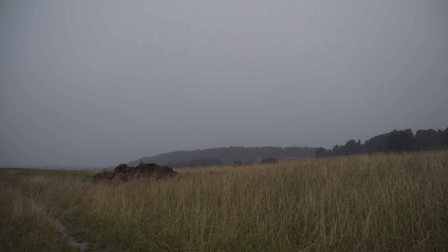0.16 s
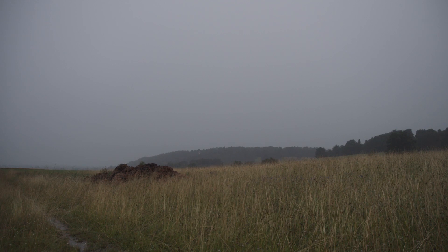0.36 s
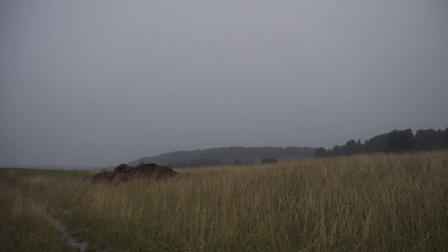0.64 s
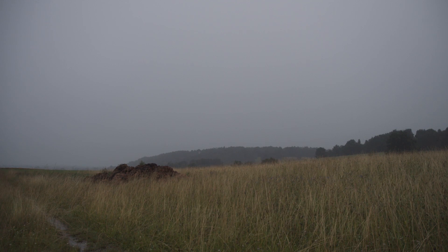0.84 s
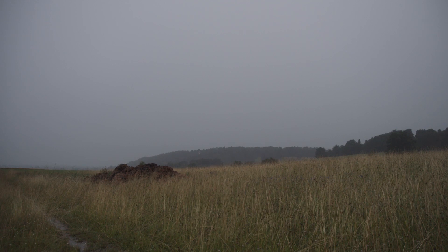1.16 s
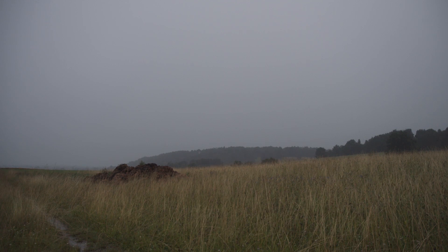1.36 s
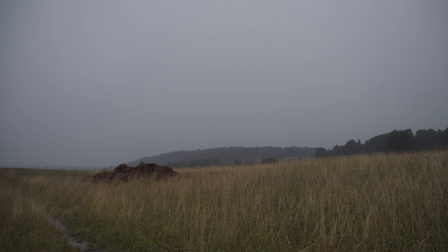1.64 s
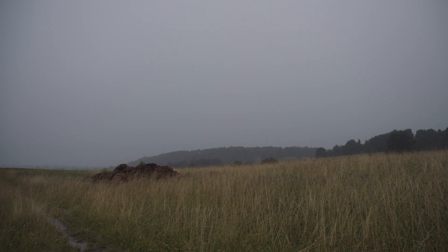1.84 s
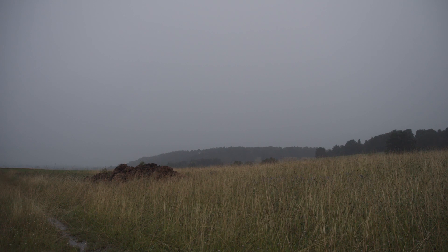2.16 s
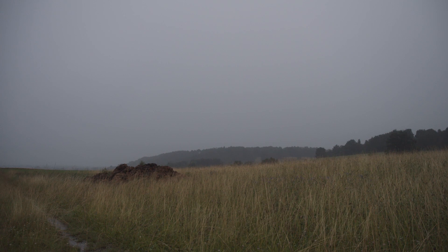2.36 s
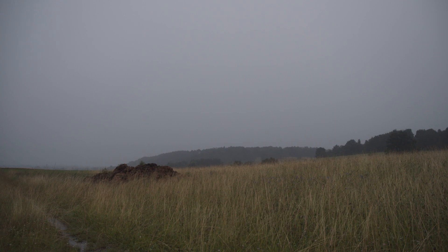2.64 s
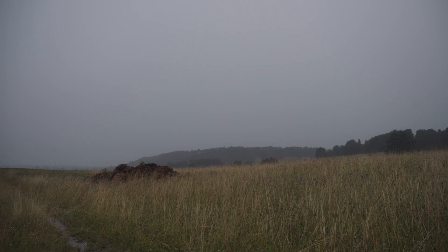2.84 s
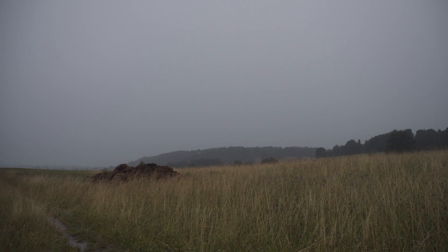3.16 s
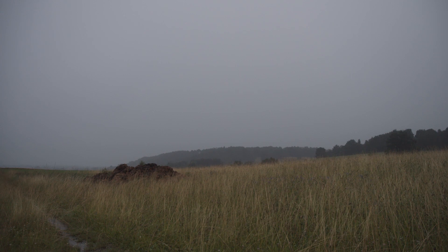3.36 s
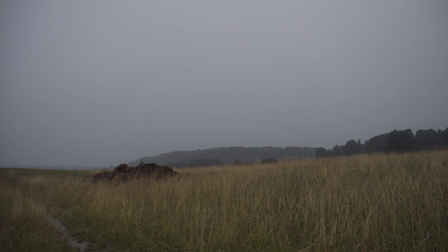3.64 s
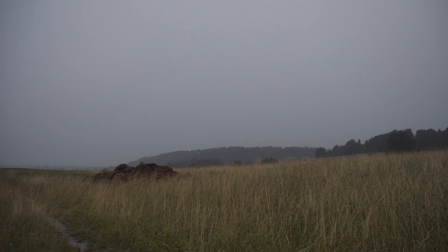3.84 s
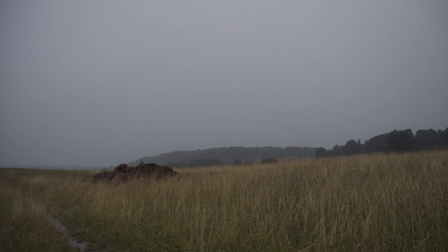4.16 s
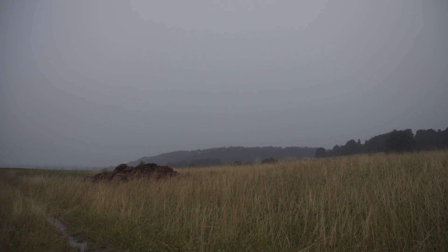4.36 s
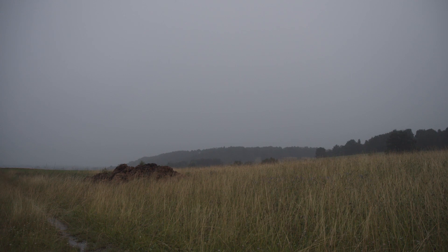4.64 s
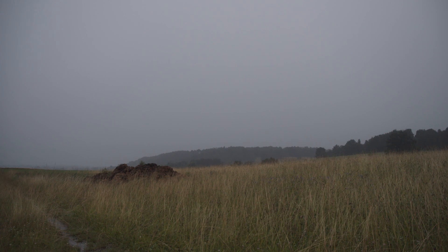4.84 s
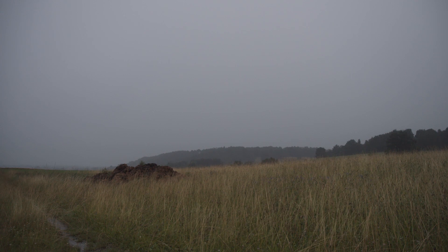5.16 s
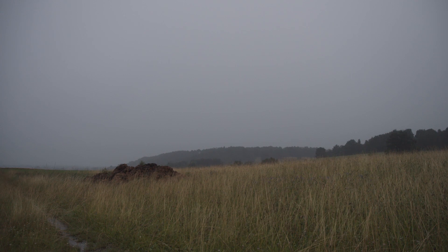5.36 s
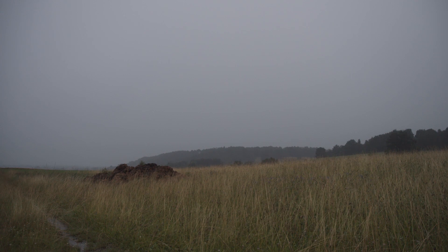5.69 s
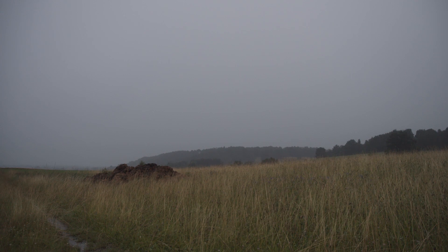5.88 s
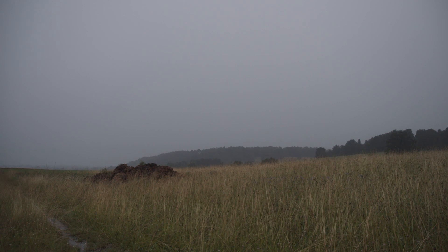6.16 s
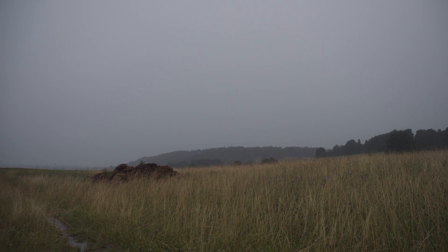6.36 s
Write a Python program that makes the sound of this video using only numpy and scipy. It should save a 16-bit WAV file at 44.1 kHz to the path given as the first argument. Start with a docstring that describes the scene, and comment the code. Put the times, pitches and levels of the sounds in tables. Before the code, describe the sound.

Close thunder tears and cracks sharply over an open grassy field, then sinks into a deep booming roll above light rain.

```python
"""Thunder tears brightly, with claps almost from the start, over light rain; it cracks hardest near one second,
then sinks into a deeper, booming roll.
The crooked lightning channel sends shock fronts, summed here as trains of short pulses in surges and claps.
An open field reflects each front a moment later and a forest edge scatters a soft tail. Rain is filtered
noise with a patter of grains, breeze is low noise, and drops tick and thud close to the microphone."""
import sys
import numpy as np
from scipy import signal
from scipy.fft import rfft, irfft
from scipy.io import wavfile
from scipy.ndimage import uniform_filter1d

SR = 44100
rng = np.random.default_rng(int(sys.argv[2]) if len(sys.argv) > 2 else 0)


def file_out(sig):
    """Save sig as 16-bit WAV at sys.argv[1]."""
    # one column per channel
    cols = np.atleast_2d(sig).T
    # limit, then scale
    lim = np.clip(cols, -1, 1)
    pcm = np.round(lim * 32767).astype(np.int16)
    wavfile.write(sys.argv[1], SR, pcm)


N = 287532  # samples


def gain_of(db):
    """Logarithmic level: decibels become an amplitude factor."""
    return 10 ** (np.asarray(db) / 20)


def evened(x):
    """Energy normalisation: scales to rms 1 over all channels together."""
    return x / np.sqrt(np.mean(x ** 2) + 1e-20)


def read(points, hz):
    """Logarithmic frequency scale: interpolates a table along it."""
    f, value = np.transpose(points)
    return np.interp(np.log(hz + 1), np.log(f + 1), value)


def add(mix, s, sound):
    """Superposition: sums a stereo sound into the mix at time s."""
    start = max(round(s * SR), 0)
    part = mix[:, start:][:, :sound.shape[-1]]
    part += sound[..., :part.shape[-1]]


def shaped(x, gain):
    """Linear filtering: multiplies the spectrum of x by gain(hz)."""
    hz = np.fft.rfftfreq(x.shape[-1], 1 / SR)
    return irfft(rfft(x) * gain(hz), x.shape[-1])


def pulse(db, size=4096):
    """Minimum phase: the sharpest causal pulse with spectrum db(hz), scaled to energy 1."""
    hz = abs(np.fft.fftfreq(size, 1 / SR))
    log_gain = np.log(np.maximum(gain_of(db(hz)), 1e-5))
    # the Hilbert transform of the log gain supplies the phase
    wave = np.fft.ifft(np.exp(np.conj(signal.hilbert(log_gain)))).real
    return wave / np.linalg.norm(wave)


# Spectrum of one shock front, before air loss: pitch_hz [Hz], level_db [dB, relative]
FRONT_SPECTRUM = [(15, -60), (25, -3), (175, 0), (215, -1.5), (258, 1), (403, -1), (477, -0.5), (553, -3.5),
                  (641, -2.5), (862, -6.5), (1140, -14.5), (1230, -14.5), (2100, -35.5), (2730, -65),
                  (4620, -120)]


def shock(absorb_db, air_hz=2000):
    """Atmospheric absorption: above air_hz the loss in dB grows with the square of frequency."""
    def spectrum_db(hz):
        air_loss_db = absorb_db * np.maximum((hz / air_hz) ** 2 - 1, 0)
        return read(FRONT_SPECTRUM, np.minimum(hz, air_hz)) - air_loss_db
    return pulse(spectrum_db)


BASS_HZ, EDGE_HZ = 160, 850  # borders between bass, body and tearing edge


def registers(x, order=8):
    """Complementary filtering: bass, body and tearing edge that sum to the whole thunder."""
    bass = shaped(x, lambda hz: 1 / (1 + (hz / BASS_HZ) ** order))
    below_edge = shaped(x, lambda hz: 1 / (1 + (hz / EDGE_HZ) ** order))
    return bass, below_edge - bass, x - below_edge


def from_sky(fronts, width=0.091):
    """Interaural level difference: each front has its own direction and favours one side a little."""
    side = width * rng.standard_normal(len(fronts))
    return np.array([fronts * (1 + side), fronts * (1 - side)])


def boil(x, patch_db=2.5, size=1024, frame_count=13, bin_count=2):
    """Interference along paths through moving air: narrow bands swell and fade at random."""
    overlap = size * 3 // 4
    z = signal.stft(x, nperseg=size, noverlap=overlap)[2]
    noise = rng.standard_normal(z.shape[1:])  # one pattern for both sides
    smooth_in_time = uniform_filter1d(noise, frame_count, 1)
    patches = evened(uniform_filter1d(smooth_in_time, bin_count, 0))
    z = z * gain_of(patch_db * np.clip(patches, -2, 2))
    return signal.istft(z, nperseg=size, noverlap=overlap)[1][:, :N]


SURGE_RISE = 0.69  # a surge builds in this share of the time it takes to fade

# Branches of the channel, each heard as one surge of the roll:
# crest_s [s], level_db [dB, of the body], fade_s [s, to 1/e in power], brightness_db [dB]
BRANCH_SURGES = [(0.116, -42.5, 0.018, 5.5), (0.301, -38, 0.073, 3), (0.398, -40.5, 0.031, 12),
                 (0.534, -42, 0.043, 3), (0.727, -37.5, 0.047, -2.5), (1.067, -39.5, 0.041, 2),
                 (1.177, -46, 0.068, 3.5), (1.304, -49.5, 0.036, 9), (1.385, -46, 0.028, -9),
                 (1.48, -60.5, 0.035, 17), (1.599, -48.5, 0.051, 4), (1.852, -38, 0.059, -0.5),
                 (1.98, -47.5, 0.05, 10), (2.217, -42.5, 0.026, 4), (2.469, -42.5, 0.072, 0.5),
                 (2.59, -46, 0.059, -10.5), (2.678, -39, 0.049, -1), (2.81, -43, 0.018, -8),
                 (2.979, -38, 0.072, -4.5), (3.11, -38, 0.059, -4), (3.228, -39, 0.014, -5),
                 (3.288, -45, 0.055, -5.5), (3.379, -37.5, 0.024, -4), (3.503, -40, 0.038, 0),
                 (3.6, -40, 0.055, -2), (3.709, -39.5, 0.068, 5), (3.843, -35, 0.032, -2),
                 (3.92, -43, 0.066, -4.5), (4.107, -38, 0.079, 1), (4.2, -43, 0.069, 4),
                 (4.322, -40.5, 0.085, 0), (4.415, -44.5, 0.037, 8.5), (4.516, -43.5, 0.039, -9.5),
                 (4.655, -46, 0.034, 4), (4.76, -42.5, 0.083, 0.5), (4.862, -48.5, 0.021, 7),
                 (5.014, -49.5, 0.069, -4.5), (5.367, -53, 0.16, 2), (5.744, -53.5, 0.1, -6.5),
                 (5.912, -47.5, 0.1, 1), (6.285, -43, 0.071, -2.5), (6.47, -44.5, 0.1, -2.5)]


def surges(t, leaning):
    """Incoherent power sum of surges; brightness enters with the factor leaning."""
    power = 0
    for crest, db, fade, bright in BRANCH_SURGES:
        distance = np.maximum((t - crest) / fade, (crest - t) / (fade * SURGE_RISE))
        power = power + gain_of(db + leaning * bright) ** 2 * np.exp(-distance ** 2)
    return np.sqrt(power)


# The near, low part of the channel tears brightly; the far part up in the cloud booms.
# Levels are against the body.
EDGE_NEAR_DB, EDGE_FAR_DB, EDGE_FADE_S = -3.5, -13.5, 1.92
BASS_NEAR_DB, BASS_FAR_DB = -8.5, -5.5
BOOM_S, BOOM_ONSET_S = 2.4, 0.11  # when the boom takes over, and how gradually

# Unbroken rumble under the surges: time_s [s], level_db [dB, before bed_trim_db]
RUMBLE_BED = [(0.0, -42.5), (1.12, -41), (1.32, -46), (1.61, -47.5), (1.85, -55.5), (1.98, -42.5),
              (2.4, -45.5), (2.61, -43.5), (4.34, -41.5), (5.08, -46), (6.19, -47.5), (6.52, -56)]


def roll(fronts_per_s=1800, clump_db=1.11, clump_hz=35, bed_trim_db=-4.0,
         bed_bass_db=3.0, bed_edge_db=2.5, step_count=64):
    """Superposed fronts from countless channel kinks: strength throbs, and later sound is deeper."""
    t = np.arange(0, N, step_count) / SR
    bed = gain_of(np.interp(t, *np.transpose(RUMBLE_BED)) + bed_trim_db)
    boom = (1 + np.tanh((t - BOOM_S) / BOOM_ONSET_S)) / 2
    bass_db = BASS_NEAR_DB + (BASS_FAR_DB - BASS_NEAR_DB) * boom
    edge_db = EDGE_FAR_DB + (EDGE_NEAR_DB - EDGE_FAR_DB) * np.exp(-t / EDGE_FADE_S)
    # a bright surge has less bass and more edge
    bass_level = gain_of(bass_db) * np.hypot(surges(t, -1.3), gain_of(bed_bass_db) * bed)
    body_level = np.hypot(surges(t, 0), bed)
    edge_level = gain_of(edge_db) * np.hypot(surges(t, 0.74), gain_of(bed_edge_db) * bed)
    levels = [bass_level, body_level, edge_level]

    # a fast, uneven throb
    clumps = evened(shaped(rng.standard_normal(N), lambda hz: hz / clump_hz * np.exp(-hz / clump_hz)))
    sizes = gain_of(clump_db * clumps) * rng.choice([-1, 1], N)
    fronts = from_sky(sizes * (rng.random(N) < fronts_per_s / SR))
    thunder = signal.oaconvolve(fronts, shock(absorb_db=40.5)[None])[:, :N]
    bands = registers(boil(thunder))
    now = np.arange(N) / SR
    return sum(np.interp(now, t, level) * evened(band) for level, band in zip(levels, bands))


# Spectrum of the rain: pitch_hz [Hz], level_db [dB per Hz, relative]
RAIN_SPECTRUM = [(20, 16.5), (100, -5), (500, 4), (1500, 10.5), (2800, 4), (4000, -0.5), (5500, -1),
                 (6700, -3.5), (10000, -5.5), (13000, -10), (15000, -6), (16000, -33.5)]
# Likeness of the rain at left and right: pitch_hz [Hz], shared_power [share, 0 to 1]
RAIN_LIKENESS = [(20, 0.09), (1500, 0.57), (4000, 0.67), (8000, 0.13), (16000, 0)]


def rain(level_db=-66.0, patter=0.42, patter_per_s=900, size_db=14.0):
    """Partially coherent noise: far drops merge into a hiss, nearer ones patter in the grass."""
    sizes = gain_of(size_db * np.minimum(rng.exponential(1, (3, N)), 5))
    grains = sizes * (rng.random((3, N)) < patter_per_s / SR)
    signed_grains = grains * rng.choice([-1, 1], (3, N))
    drive = rng.standard_normal((3, N)) + patter * evened(signed_grains)

    def same(hz):
        return np.clip(read(RAIN_LIKENESS, hz), 0, 1)
    own = shaped(drive[:2], lambda hz: np.sqrt(1 - same(hz)))
    shared = shaped(drive[2], lambda hz: np.sqrt(same(hz)))
    coloured = shaped(own + shared, lambda hz: gain_of(read(RAIN_SPECTRUM, hz)))
    return gain_of(level_db) * evened(coloured)


def breeze(level_db=-64.0, top_hz=55., low_hz=22.):
    """Incoherent low-frequency noise: moving air rumbles faintly, differently on each side."""
    def spectrum(hz):
        return hz ** 2 / (hz ** 2 + low_hz ** 2) / (1 + (hz / top_hz) ** 2)
    return gain_of(level_db) * evened(shaped(rng.standard_normal((2, N)), spectrum))


# Lag of the ground bounce, longer the higher the sounding part of the channel stands:
# time_s [s], lag_s [s]
GROUND_LAG = [(0, 0.0063), (.6, 0.0046), (1.2, 0.0049), (2.2, 0.004), (2.7, 0.0048), (3.2, 0.0066),
              (4.1, 0.0063), (4.6, 0.0056), (6.5, 0.0056)]


def ground(x, bounce=0.33, grass_hz=890.0):
    """Comb filtering: the field returns each front late and dulled, a hollow colour that drifts."""
    now = np.arange(N)
    then = now - SR * np.interp(now / SR, *np.transpose(GROUND_LAG))
    dull = shaped(x, lambda hz: 1 / (1 + (hz / grass_hz) ** 2))
    bounced = np.array([np.interp(then, now, side) for side in dull])
    return (x + bounce * bounced) / np.sqrt(1 + bounce ** 2)


# Decay time of the forest tail: pitch_hz [Hz], t60_s [s, to fall 60 dB]
FOREST_DECAY = [(40, 1), (300, 0.2), (1000, 0.97), (3000, 0.8)]


def forest(x, rise_s=0.081):
    """Diffuse scattering: trees return a soft one-second tail that dies fastest around 300 Hz."""
    hz, t, z = signal.stft(rng.standard_normal((2, SR)), SR, nperseg=256)
    decay = gain_of(-60 * t / read(FOREST_DECAY, hz)[:, None])
    z *= decay * (1 - np.exp(-t / rise_s))
    tail = signal.istft(z, SR, nperseg=256)[1]
    return signal.fftconvolve(x, tail / np.linalg.norm(tail[0]), axes=1)[:, :N]


CLAP_BASS_DB, CLAP_EDGE_DB = -15, -18  # against the body, at brightness 0

# Stretches of channel that lie broadside and arrive all at once:
# start_s [s, main front], level_db [dB, strongest moment, before trim_db],
# brightness_db [dB, edge up and bass down], pitch_hz [Hz, of the knock], spread_s [s, fade to 1/e]
BROADSIDE_CLAPS = [(0.099, -31, 9, 837, 0.0054), (0.247, -23, 7, 420, 0.026), (0.295, -20, 9.5, 372, 0.007),
                   (0.693, -28.5, 10, 448, 0.0042), (0.802, -25.5, 2, 266, 0.008),
                   (0.875, -28, 7.5, 213, 0.012), (0.938, -28.5, 0, 180, 0.007),
                   (0.967, -14.5, 5, 257, 0.017), (0.981, -18.5, 7, 220, 0.016),
                   (0.993, -15, -17, 493, 0.0058), (1.019, -20.5, -1.5, 277, 0.0059),
                   (1.054, -17.5, -5, 301, 0.006), (1.142, -22, -6, 780, 0.0053),
                   (1.18, -26, 6, 180, 0.0091), (1.201, -28, 0, 450, 0.013), (1.243, -21, 6, 770, 0.0089),
                   (1.39, -26.5, 5, 300, 0.0081), (1.555, -29, -15, 190, 0.0062),
                   (1.853, -24, -11, 500, 0.0079), (1.894, -26.5, -8, 537, 0.039),
                   (1.958, -25.5, 4, 490, 0.004), (2.011, -25.5, -9, 194, 0.011),
                   (2.041, -22, -3, 267, 0.0096), (2.212, -25, -9, 288, 0.022),
                   (2.304, -34, 12, 326, 0.006), (2.498, -28, 4, 530, 0.014), (2.615, -24, 4, 286, 0.016),
                   (2.657, -22, 13, 664, 0.005), (2.676, -20, 3, 316, 0.0062), (2.741, -24, -3, 618, 0.013),
                   (2.76, -26, -6, 297, 0.0058), (3.573, -27.5, 2, 386, 0.0061),
                   (3.615, -29.5, 3, 258, 0.0044), (3.743, -24.5, 0, 348, 0.015),
                   (3.762, -25.5, -5, 335, 0.018), (3.862, -24.5, -1, 178, 0.006),
                   (4.159, -30, 0, 630, 0.0078), (4.401, -27.5, 6, 364, 0.014),
                   (4.752, -24.5, -5, 366, 0.0076), (4.868, -30.5, 3, 470, 0.0063),
                   (5.274, -34, 0, 388, 0.019), (5.452, -32, -2, 322, 0.0069),
                   (6.296, -23.5, -11.5, 176, 0.021)]


def claps(trim_db=-7.5, crowd=1.0, rise_s=0.003, fronts_per_s=1200, knock_db=10.0,
          knock_octaves=0.21, size=8192, lead_count=1024, window_count=384):
    """Simultaneous arrival: a strong front amid weaker ones; a spectral peak gives the knock its pitch."""
    out = np.zeros((2, N))
    t = (np.arange(size) - lead_count) / SR
    front = shock(absorb_db=15.0)
    for s, db, bright, pitch, spread in BROADSIDE_CLAPS:
        swell = np.exp(-np.maximum(t / spread, -t / rise_s))
        arrivals = rng.choice([-1, 1], size) * (rng.random(size) < fronts_per_s / SR)
        train = crowd * swell * arrivals
        train[lead_count] = 1  # the main front
        # the peak stands for evenly spaced kinks
        knock = pulse(lambda hz: knock_db * np.exp(-np.log2((hz + 1) / pitch) ** 2 / knock_octaves ** 2))
        knocking_front = signal.fftconvolve(front, knock)
        clap = signal.oaconvolve(from_sky(train), knocking_front[None])
        bass, body, edge = map(evened, registers(clap))
        wave = body + gain_of(CLAP_BASS_DB - bright) * bass + gain_of(CLAP_EDGE_DB + bright) * edge
        strongest = np.sqrt(uniform_filter1d(wave[0] ** 2, window_count).max())  # short-time rms, left
        add(out, s + t[0], gain_of(db + trim_db) * wave / strongest)
    return out


# Spectrum of a drop's bright tick: pitch_hz [Hz], level_db [dB, relative]
TICK_SPECTRUM = [(1000, -28), (5000, -10), (8000, -3.5), (10500, -9.5), (12800, 5.5), (14500, -15),
                 (16500, -21.5)]
# Spectrum of a drop's duller thud: pitch_hz [Hz], level_db [dB, relative]
THUD_SPECTRUM = [(300, -14), (1500, 6.5), (3000, -2), (5500, -0.5), (9000, -9), (16000, -23)]


def drop(db, thud_db, pan_db, splash=.15, splash_s=0.0028, detune=0.062, size=1024):
    """Impulse response to impact and brief splash: a bright tick over a duller thud."""
    hit = splash * rng.standard_normal((2, size)) * np.exp(-np.arange(size) / SR / splash_s)
    hit[:, 0] += 1
    stretch = np.exp(detune * rng.standard_normal(2))  # the tick differs with the spot that is struck
    tick = np.array([pulse(lambda hz: read(TICK_SPECTRUM, hz * k), size=size) for k in stretch])
    thud = gain_of(thud_db) * pulse(lambda hz: read(THUD_SPECTRUM, hz), size=size)
    wave = signal.fftconvolve(hit, tick + thud, axes=1)
    return gain_of([[db + pan_db / 2], [db - pan_db / 2]]) * wave / abs(wave).max()


SMALL_DROP_DB, DROP_SIZES_DB = -58, 3  # level of the smallest drop before its trim; spread of sizes
THUD_DB, THUD_GROWTH = -3.5, 0.49  # thud against tick at SMALL_DROP_DB; dB more for each dB of size

# Large drops landing close by:
# start_s [s], level_db [dB, peak before large_trim_db], pan_db [dB, left over right]
LARGE_DROPS = [(0.1537, -46.5, 3.5), (0.694, -52.5, 14), (1.083, -49, 7), (2.0523, -46, 9), (2.593, -50, 9),
               (2.814, -57, 14), (2.945, -47, 1.5), (3.652, -50, -3), (3.9547, -42, 4), (4.5337, -43.5, 2),
               (4.71, -52, 8), (4.806, -48.5, 0), (5.1765, -50, 8), (5.263, -44, 6), (5.3637, -54, 11),
               (5.4058, -48.5, 9), (5.446, -48, 2), (5.669, -49, 10), (5.8418, -45, -2), (5.9617, -39, 2),
               (6.048, -48, 7), (6.127, -49, -2.5)]


def near_drops(large_trim_db=3.5, small_trim_db=-1.5, scatter_db=10.5, lean_db=5.5, count=170):
    """Exponential size distribution: few large drops, many small; the larger, the more they thud."""
    out = np.zeros((2, N))

    def thud_level(db):
        return THUD_DB + THUD_GROWTH * (db - SMALL_DROP_DB)
    for s, db, pan_db in LARGE_DROPS:
        add(out, s, drop(db + large_trim_db, thud_level(db), pan_db))
    for when, chance, side in rng.random((count, 3)):
        db = SMALL_DROP_DB + DROP_SIZES_DB * min(-np.log(1 - chance), np.pi)  # larger is rarer
        pan_db = lean_db + scatter_db * (2 * side - 1)
        add(out, when * N / SR, drop(db + small_trim_db, thud_level(db), pan_db))
    return out


# Balance of the thunder: pitch_hz [Hz], pan_db [dB, left over right]
THUNDER_BALANCE = [(60, 2), (150, 2.0), (380, 0), (950, 1), (2380, 4.5), (5980, -14), (15000, -2)]


def scene(echo_db=-20.5):
    """Superposition: thunder with bounce and tail, lows a little left and high treble right, over rain."""
    thunder = ground(roll() + claps())
    thunder = thunder + gain_of(echo_db) * forest(thunder)
    thunder = shaped(thunder, lambda hz: gain_of(np.outer([.5, -.5], read(THUNDER_BALANCE, hz))))
    return thunder + rain() + near_drops() + breeze()


TOP_HZ = 15900  # upper band limit


def record(dry, low_cut_hz=53.0):
    """Band limiting: the microphone loses the deepest bass, then a low-pass removes the top."""
    heard = shaped(dry, lambda hz: hz ** 2 / np.hypot(hz ** 2, low_cut_hz ** 2))
    low_pass = signal.firwin(511, TOP_HZ, window=("kaiser", 9), fs=SR)
    return signal.oaconvolve(heard, low_pass[None], "same")


dry = scene()
out = record(dry)
file_out(out)
```